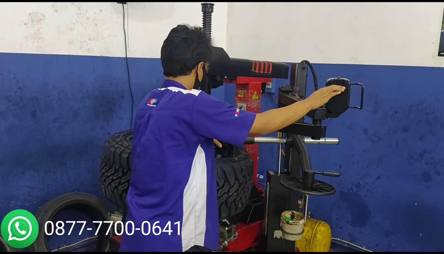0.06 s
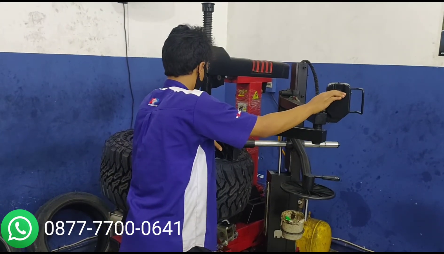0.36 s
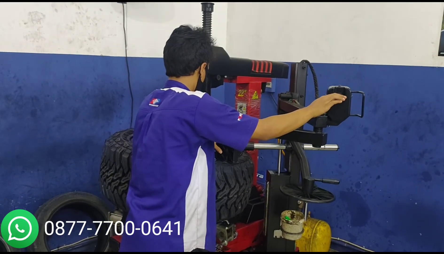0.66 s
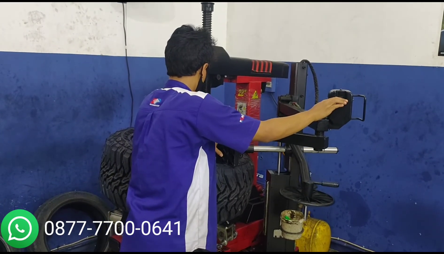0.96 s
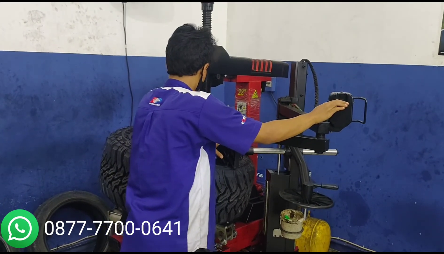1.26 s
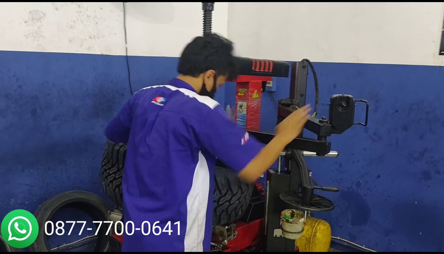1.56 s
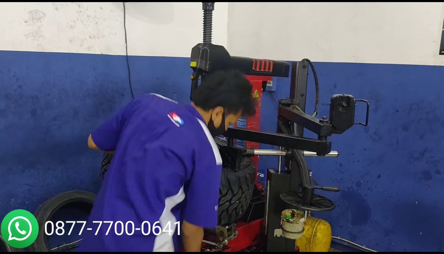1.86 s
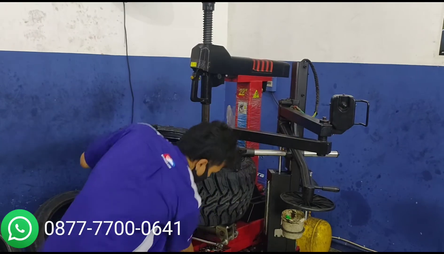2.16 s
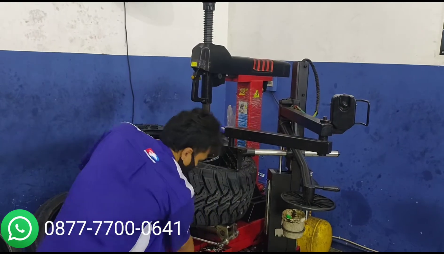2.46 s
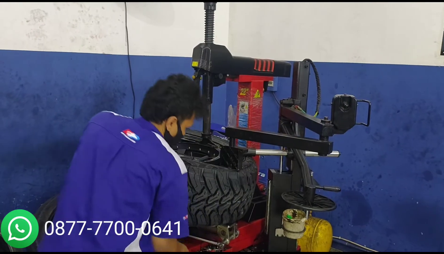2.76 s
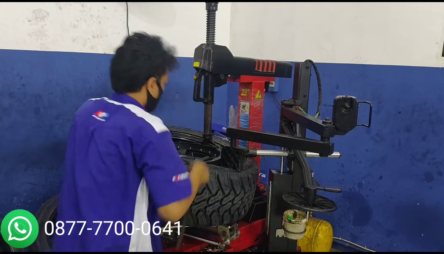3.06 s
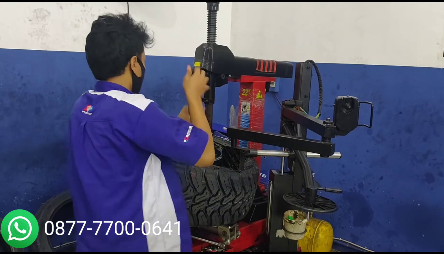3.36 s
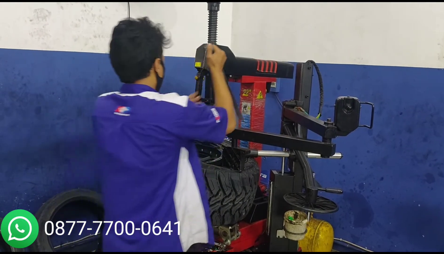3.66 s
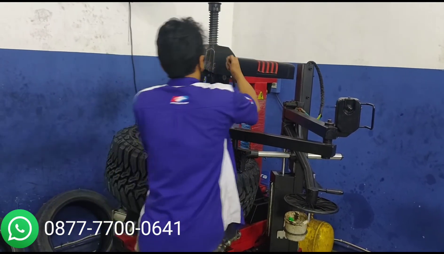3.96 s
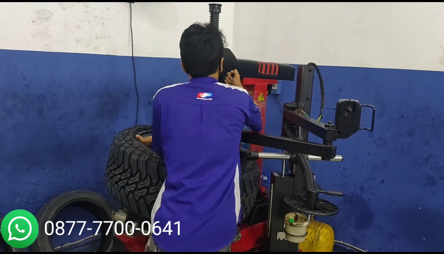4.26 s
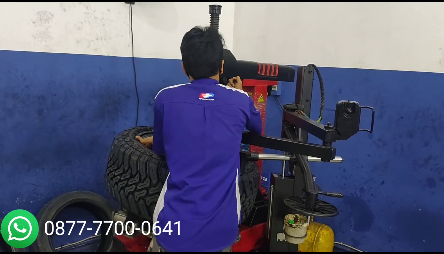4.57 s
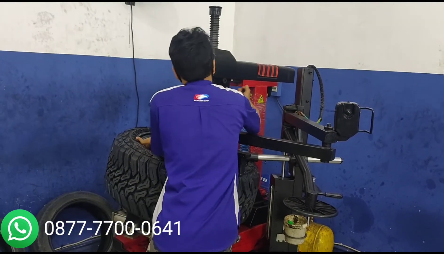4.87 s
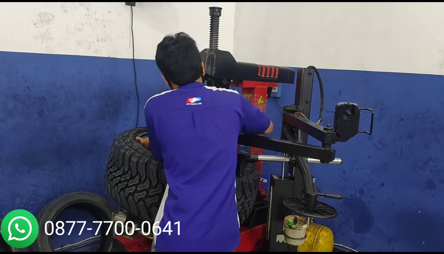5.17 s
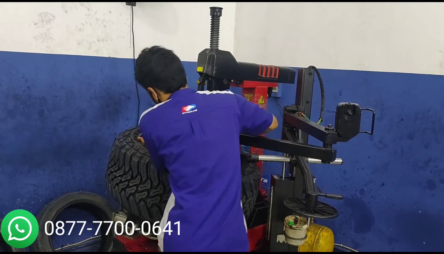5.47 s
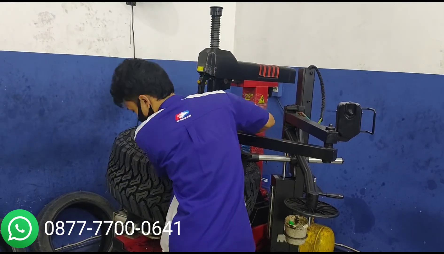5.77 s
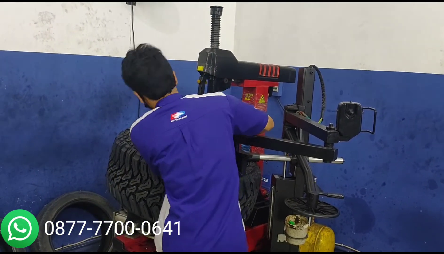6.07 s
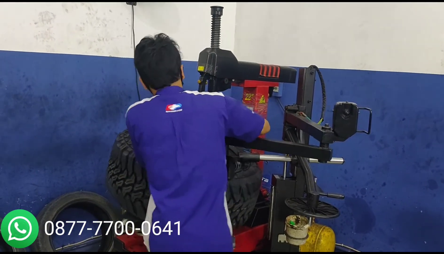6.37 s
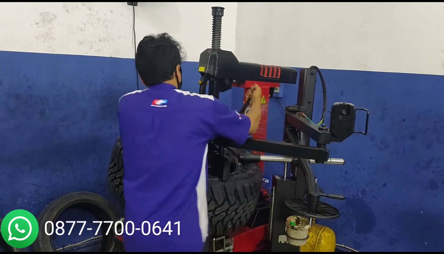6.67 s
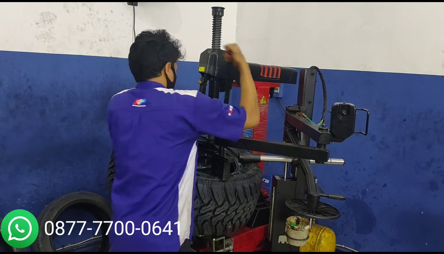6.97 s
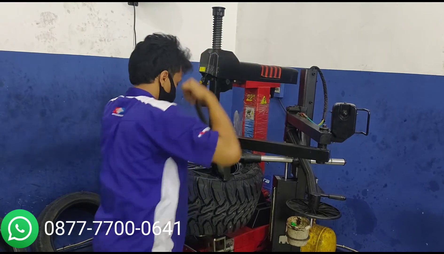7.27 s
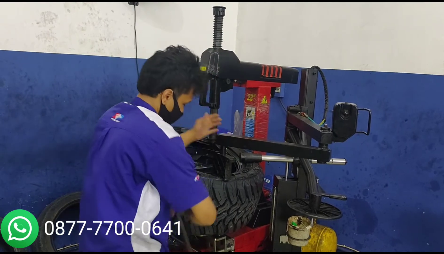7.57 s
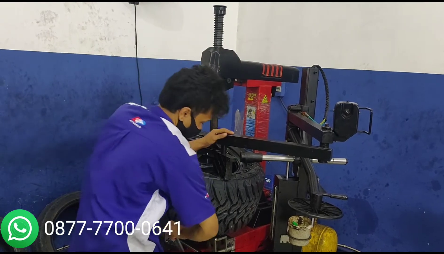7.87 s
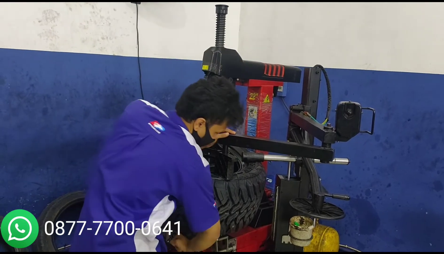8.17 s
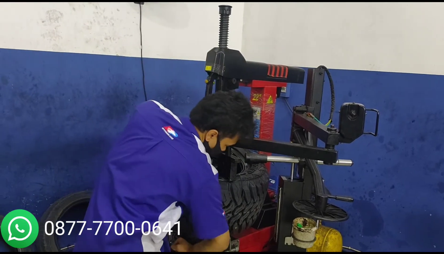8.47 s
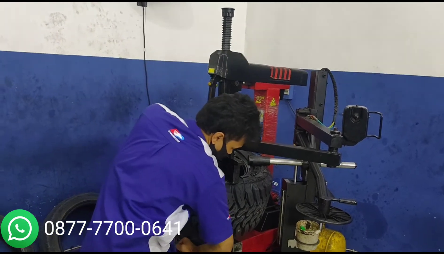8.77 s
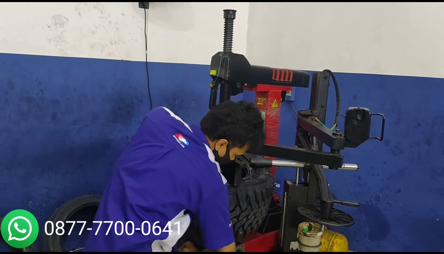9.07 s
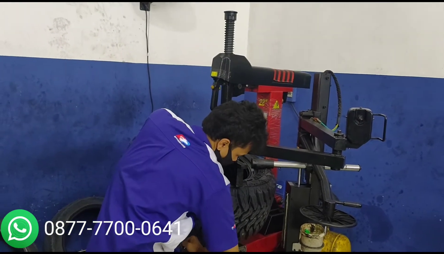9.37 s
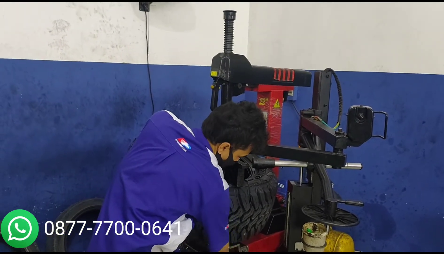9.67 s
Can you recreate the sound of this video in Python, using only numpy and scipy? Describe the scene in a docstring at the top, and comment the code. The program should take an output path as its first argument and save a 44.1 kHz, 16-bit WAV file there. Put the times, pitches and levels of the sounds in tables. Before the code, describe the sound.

A high, steady hiss of escaping air comes from a tyre machine and gradually thins. Early on, a tyre rubs softly and scrapes on its rim amid a rattle of ringing metal clanks. Soft thumps follow, and the hand-held microphone is bumped twice. Late on, a faint whistle joins the dying hiss, with two more bursts of clanking. The small workshop adds a short echo, and the hiss sits mostly to the right.

```python
"""Tyre changer venting air

A turbulent jet hisses from a tyre changer in a small hard-walled workshop, thinning as the pressure
falls and whistling as it runs out. Friction makes the tyre rub and scrape at first; impacts set steel
arms and clamps ringing. A hand-held camera, bumped twice, hears the treble mostly at its right port."""
import sys
import numpy as np
from scipy import signal
from scipy.fft import rfft, irfft, next_fast_len
from scipy.io import wavfile
from scipy.ndimage import uniform_filter1d, map_coordinates

SR = 44100
rng = np.random.default_rng(int(sys.argv[2]) if len(sys.argv) > 2 else 0)


def dump_mix(stems):
    """Bounce the given channels to the path in sys.argv[1] as a 16-bit WAV at rate SR."""
    frames = np.atleast_2d(stems).T  # one column per channel
    limited = np.clip(frames, -1, 1)  # hard clip at full scale
    pcm = np.round(limited * 32767).astype(np.int16)
    wavfile.write(sys.argv[1], SR, pcm)


N = 428652
TIME = np.arange(N) / SR

# spectrum of steel striking steel: frequency_hz, level_db
CLASH_SPECTRUM = [(120, -44), (300, -38.5), (400, -15), (500, 0), (730, 4), (1020, 5.5), (1500, 10),
                  (2300, 8), (3250, 10), (3900, -0.5), (5500, 3.5), (8200, 4.5), (10500, -6), (15000, -23)]
# spectrum of the thud of a heavy contact: frequency_hz, level_db
THUD_SPECTRUM = [(50, -37), (120, -26), (200, -2.5), (380, 3), (600, 3.5), (1000, 6.5), (1500, -17),
                 (4000, -59)]
# modes of the machine's frame: pitch_hz, level_db, t60_s
FRAME_MODES = [(373, -16.5, 0.16), (639, -12.5, 0.18), (710, -7, 0.079), (946.5, -13, 0.16),
               (1050, -8.5, 0.13), (1333, -18, 0.14), (2086, -7, 0.11), (2466, -5.5, 0.11),
               (2780, -6.5, 0.1), (5130, -3.5, 0.054)]
# the swing arm's hollow note and faint afterring: pitch_hz, level_db, t60_s
ARM_MODES = [(770, 3, 0.059), (800, -16, 0.43)]


def amp(db):
    """Decibels to amplitude ratio."""
    return 10 ** (np.asarray(db) / 20)


def unit(x):
    """Normalisation to rms 1."""
    return x / np.sqrt(np.mean(x ** 2) + 1e-20)


def along(points, hz):
    """Interpolation of (frequency_hz, value) points on a log frequency axis."""
    frequencies, values = np.transpose(points)
    return np.interp(np.log(hz + 1), np.log(frequencies + 1), values)


def wobble(rate_hz):
    """Smooth random modulation: a spline through rate_hz knots a second."""
    knots = rng.standard_normal(int(N * rate_hz / SR) + 4)
    return map_coordinates(knots, [np.arange(N) * rate_hz / SR])


def step(t, middle_s, takes_s):
    """A logistic transition from 0 to 1 around middle_s."""
    return (1 + np.tanh((t - middle_s) / takes_s / 2)) / 2


def fading(t, t60_s, attack_s):
    """Damped vibration: a quick rise, then exponential decay."""
    return amp(-60 * t / t60_s) * (1 - np.exp(-t / attack_s))


def add(track, start_s, sound):
    """Superposition of a sound on the track."""
    part = track[:, round(start_s * SR):][:, :sound.shape[-1]]
    part += sound[..., :part.shape[-1]]


def filtered(x, response):
    """Linear filtering: the spectrum is multiplied by response(hz)."""
    size = x.shape[-1]
    padded = next_fast_len(size + 8192)
    return irfft(rfft(x, padded) * response(np.fft.rfftfreq(padded, 1 / SR)), padded)[..., :size]


def swept(x, gain, size=512):
    """Time-varying filtering: short-time spectra are multiplied by gain(hz, t)."""
    hz, t, spectra = signal.stft(x, SR, nperseg=size)
    return signal.istft(spectra * gain(hz[:, None], t), SR)[1][:, :x.shape[-1]]


def patchy(x, depth_db, bands, frames, size=512):
    """Random modulation in patches of frequency and time, with deeper dips than peaks; rms 1."""
    def gain(hz, t):
        field = rng.standard_normal((2, len(hz), len(t)))
        field = unit(uniform_filter1d(uniform_filter1d(field, bands, 1), frames, 2))
        return amp(depth_db * np.minimum(field, 0.7))
    return unit(swept(x, gain, size))


def noise(spectrum, size=N):
    """Coloured noise of rms 1, partially coherent between the ports like the shop's sound field."""
    # left-right likeness of the field: frequency_hz, correlation
    coherence = [(60, 0.76), (150, 0.89), (300, 0.84), (700, 0.42), (1300, 0.17), (2600, -0.78),
                 (3700, -0.14), (5000, -0.15), (7000, -0.032), (8300, 0.23), (11000, -0.18)]
    def colour(hz):
        angle = np.arccos(np.clip(along(coherence, hz), -1, 1)) / 2
        return amp(along(spectrum, hz)) * [np.cos(angle), np.sin(angle)]
    mid, side = filtered(rng.standard_normal((2, size)), colour)
    return unit(np.array([mid + side, mid - side]))


def band(centre_hz, width, size):
    """A noise-driven resonance; width is a share of its pitch."""
    return noise([(centre_hz * (1 + width) ** k, -10 * k * k) for k in range(-3, 4)], size)


def valve_open(t, release_s=1.47, decay_s=0.52):
    """Exponential relaxation: 1 while the valve is held, dying away once it is let go."""
    return np.exp(-np.maximum(t - release_s, 0) / decay_s)


def running_low(t):
    """Depletion of the air: 0 while there is pressure, 1 when it is nearly spent."""
    return step(t, middle_s=8.9, takes_s=0.44)


def swelling(t):
    """Slow modulation: swells and dips add decibels to the hiss and to the vent's resonance."""
    # swells and dips: start_s, rise_s, decay_s, hiss_gain_db, resonance_gain_db
    swells = [(-0.15, 0.22, 0.28, 4, -4.5), (1.9, 0.25, 0.73, -1, -11), (2.6, 0.18, 2.5, 4.5, 5.5),
              (5.6, 0.34, .45, 4, 3), (5.9, 0.54, 1.5, 1.7, -0.5)]
    gains_db = 0
    for start_s, rise_s, decay_s, hiss_db, resonance_db in swells:
        rise = np.clip((t - start_s) / rise_s, 0, 1)
        decay = np.exp(-np.maximum(t - start_s - rise_s, 0) / decay_s)
        gains_db += np.outer([hiss_db, resonance_db], rise * decay)
    return gains_db


def hiss(start_db=-19, fall_db_per_s=1.154, flutter_db=0.2, drift_db=0.5):
    """Turbulence in the fine jet excites two vent resonances and fades as the pressure falls."""
    # spectrum of the jet: frequency_hz, level_db
    jet_spectrum = [(3500, -36), (5700, -13), (6200, -3.5), (6900, -3.5), (7300, -3), (8200, 1.5),
                    (9000, -1.5), (9700, -2.5), (10200, -7), (10800, -7.5), (12200, -14.5), (13600, -10.5),
                    (15500, -15)]
    def vent(hz, t):
        peak = lambda at_hz, wide_hz: 1 / (1 + (2 * (hz - at_hz) / wide_hz) ** 4)
        # the main resonance climbs and sharpens as the flow drops
        centre_hz = 7895 + 45 * t
        width_hz = 1050 * np.exp(-0.041 * t) * (1 - 0.35 * running_low(t))
        lift_db = 1 + 11.5 * running_low(t) + swelling(t)[1]
        upper_hz = 8900 + 686 * step(t, 2.6, 0.12)  # the upper resonance jumps higher at about 2.6 s
        gain = 1 + amp(lift_db) * peak(centre_hz, width_hz) + amp(-7) * peak(upper_hz, 510)
        return gain / np.linalg.norm(gain * amp(along(jet_spectrum, hz)), axis=0)  # constant power
    jet = swept(noise(jet_spectrum), vent)
    jet = patchy(jet, depth_db=0.97, bands=8, frames=7)
    jet = patchy(jet, depth_db=5.5, bands=1, frames=12, size=2048)
    level_db = start_db - fall_db_per_s * TIME - 2.5 * running_low(TIME) + swelling(TIME)[0]
    return jet * amp(level_db + flutter_db * wobble(26) + drift_db * wobble(3.96))


def rush(start_db=-29, fall_db_per_s=1.44, open_edge_hz=490, flutter_db=0.33):
    """Broadband flow noise: a rush of air roars below the hiss and gradually loses its low end."""
    # spectrum of the rush: frequency_hz, level_db
    rush_spectrum = [(200, -5), (800, 1.5), (1150, -2), (1650, 2), (2100, -4), (2600, 2), (3400, 0),
                     (4000, -4), (4700, -1), (5300, 0.5), (5750, -1.5), (7000, -23), (10000, -34)]
    def high_pass(hz, t):
        shut_edge_hz = 1280 + 64 * t + 800 * running_low(t)
        edge_hz = shut_edge_hz + (open_edge_hz - shut_edge_hz) * valve_open(t)
        return 1 / np.sqrt(1 + (edge_hz / (hz + 1)) ** 16)
    air = swept(noise(rush_spectrum), high_pass)
    air = patchy(air, depth_db=2.3, bands=2, frames=13)
    air = patchy(air, depth_db=5.5, bands=2, frames=7, size=2048)
    level_db = start_db - fall_db_per_s * TIME - 3.5 * running_low(TIME) + 0.16 * swelling(TIME)[0]
    return air * amp(level_db + flutter_db * wobble(22))


def tyre_rub(creep_db=-52, attack_s=0.008, release_s=0.052):
    """Friction: rubber creeps on the table while the valve is held, and judders in short drags."""
    # spectrum of rubbing rubber: frequency_hz, level_db
    rubber_spectrum = [(60, -43.5), (130, -17.5), (200, 5), (270, 2), (400, 2), (600, 0.5), (1200, -37)]
    # spectrum of the rumble beneath it: frequency_hz, level_db
    rumble_spectrum = [(20, -10), (48, 2), (90, 6), (150, 3), (280, -29)]
    # drags on the table: start_s, length_s, rub_gain_db, rumble_gain_db
    drags = [(0, 0.14, -41.5, -57), (0.26, 0.16, -45, -64), (0.564, 0.27, -50, -69),
             (0.784, 0.12, -45, -43), (1.308, 0.19, -60, -63), (1.558, 0.39, -43.5, -62),
             (2.033, 0.18, -61, -56)]
    rub, rumble = amp(creep_db) * valve_open(TIME), 0
    for start_s, length_s, rub_db, rumble_db in drags:
        drag = step(TIME, start_s, attack_s) * (1 - step(TIME, start_s + length_s, release_s))
        rub += amp(rub_db - 1) * drag
        rumble += amp(rumble_db - 2) * drag
    judder = patchy(noise(rubber_spectrum), depth_db=3.5, bands=2, frames=8)
    return judder * rub + noise(rumble_spectrum) * rumble


def background(start_db=-51, sink_db=11, drift_db=0.5):
    """The shop's low ambient noise wavers and sinks to a quieter level."""
    # ambient spectrum: frequency_hz, level_db
    shop_spectrum = [(20, -23), (45, 4.5), (90, 0), (170, -2.5), (300, -8.5), (700, -9.5), (1300, -15.5),
                     (4000, -12.5), (12000, -43)]
    level_db = start_db - sink_db * step(TIME, 2.9, 0.98) - drift_db * wobble(3.04)
    return amp(level_db) * noise(shop_spectrum)


def ring(t, modes, treble_db=0, scatter_db=2.5, detune=0.0072):
    """Free vibration of damped modes, whose pitch and strength vary from blow to blow."""
    out = np.zeros((2, len(t)))
    for hz, db, t60_s in modes:
        # high modes reach the ports out of step
        phase = rng.uniform(0, 2 * np.pi) + rng.normal(0, min(hz / 2400, 2), (2, 1))
        level_db = db + rng.normal(0, scatter_db) + treble_db * (hz > 1400)
        pitch_hz = hz * (1 + detune * rng.standard_normal())
        out += amp(level_db) * fading(t, t60_s, 0.0017) * np.sin(2 * np.pi * pitch_hz * t + phase)
    return out


def in_shop(sound, wet_db):
    """Reverberation: reflections from the hard walls add a diffuse, decaying tail."""
    # reverberation time of the shop: frequency_hz, t60_s
    decay_times = [(150, 0.4), (700, 0.62), (3000, 0.36), (10000, 0.28)]
    size = sound.shape[-1]
    white = noise([(20, 0), (20000, 0)], size)
    tail = swept(white, lambda hz, t: amp(-60 * t / along(decay_times, hz)))
    tail *= 1 - np.exp(-np.arange(size) / SR / 0.0014)
    tail /= np.linalg.norm(tail[0])
    return sound + amp(wet_db) * signal.fftconvolve(sound, tail, axes=1)[:, :size]


def clanks(rebound_s=0.015):
    """Impacts clash and excite the steel's modes; with weight behind them they thud and rebound once."""
    # steel on steel: start_s, gain_db, bright_db, wheel_weight, arm_gain, jaw_gain, lever_gain, rise_s
    impacts = [(1.297, -22.5, -1.5, 0.9, 0.45, 0, 0.05, 0.0014),
               (2.439, -12, -10.5, 0.3, 0.63, 0, 0.2, 0.0043),
               (2.509, -18, -18.5, 0.55, 0.3, 0.06, 0, 0.0022),
               (2.574, -13.5, -9, 0.77, 0.1, 0.1, 0.1, 0.001), (2.608, -12, -6.5, 0.36, .4, 0, 0.3, 0.0023),
               (2.661, -11.5, -4, 0.63, 0.4, 0.17, 0, 0.0019),
               (2.691, -12, -2, 0.71, 0.24, 0, 0.25, 0.0012), (2.711, -22, 0, 0.6, 0.5, .2, .1, 0.0012),
               (2.74, -19, -2, 0.76, 0, 0.1, 0.1, 0.002), (2.824, -15, -9.5, 0.65, 0.2, 0, 0, 0.003),
               (2.868, -32.5, -13, 0.3, 0.3, 0.4, 0.2, .002),
               (8.181, -13.5, -2, 0.1, 0.4, 0.22, 0.3, 0.0015),
               (8.264, -18, -3, 0.1, 0.6, 0.04, 0.1, 0.0012),
               (8.278, -12.5, -2.5, 0.35, 0.44, 0.3, 0, 0.0015),
               (8.289, -15, -6, 0.64, 0.5, 0, 0.06, 0.00076), (8.376, -28, -8, 0, 0.8, 0, 0, 0.0035),
               (8.405, -20.5, 1.5, 0.06, 0.7, 1, 0.6, 0.0016), (8.433, -30.5, 3.5, 0, 0.85, .2, 0, 0.0016),
               (9.553, -23, -7, 0, 1, 0.07, .1, 0.0032), (9.604, -15, -6.5, 0.2, 0.77, 0.24, 0.96, 0.00078),
               (9.628, -22, -4.5, 0.41, 0.5, 0, 0, .002), (9.716, -30, -4, 0, 0.5, 0.76, 0, 0.0025)]
    # modes of a clamping jaw: pitch_hz, level_db, t60_s
    jaw_modes = [(3140, 2.5, 0.062), (3270, 4.5, 0.06), (6800, -20, 0.043), (8250, 4, 0.073)]
    # modes of the lever: pitch_hz, level_db, t60_s
    lever_modes = [(2960, 2, 0.024), (4320, -6, 0.045), (7500, -7, 0.17), (8140, 0, 0.065)]
    out, t = np.zeros((2, N)), np.arange(SR // 2) / SR
    for start_s, gain_db, bright_db, weight, arm, jaw, lever, rise_s in impacts:
        for delay_s, strength in [(0, 1), (rebound_s, amp(-2) * weight)]:
            burst = fading(t, 0.076, 0.00068) + 0.6 * fading(t, 0.0086, 0.0005)
            clash = amp(1 + bright_db) * noise(CLASH_SPECTRUM, len(t)) * burst
            thud = amp(-7) * weight ** 2 * noise(THUD_SPECTRUM, len(t)) * fading(t, 0.32, 0.0016)
            steel = amp(-5) * ring(t, FRAME_MODES, treble_db=bright_db)
            steel += arm * ring(t, ARM_MODES, scatter_db=1)
            steel += jaw * ring(t, jaw_modes) + lever * ring(t, lever_modes)
            blow = (steel + clash + thud) * (1 - np.exp(-t / rise_s))
            add(out, start_s + delay_s - 0.001, amp(gain_db) * strength * in_shop(blow, wet_db=-8.5))
    return out


def thumps(width=0.2):
    """Damped resonance: tyre and arm answer a light push, or the boom of a heavy blow, with one short, hollow
    note."""
    # light pushes and booms after heavy blows: start_s, gain_db, pitch_hz, t60_s
    pushes = [(1.877, -28, 271, 0.16), (2.114, -37.5, 348, 0.15), (2.68, -28.5, 202, .25),
              (5.122, -39, 382, 0.12), (6.231, -36, 362, 0.3), (6.467, -48, 335, 0.14),
              (6.555, -35.5, 304, .11), (7.928, -51, 176, 0.24), (8.293, -35.5, 192, 0.19),
              (9.383, -42, 296, 0.36)]
    out, t = np.zeros((2, N)), np.arange(SR // 2) / SR
    for start_s, gain_db, pitch_hz, t60_s in pushes:
        add(out, start_s, amp(gain_db) * band(pitch_hz, width, len(t)) * fading(t, t60_s, 0.0063))
    return out


def knocks(swell_s=0.018, scuff_db=-8):
    """Forced vibration: a padded contact slides briefly and stirs the low modes of frame and arm."""
    # padded contacts of the arm: start_s, gain_db, cutoff_hz, thud_db
    contacts = [(2.345, -31.5, 1100, 0), (2.374, -27.5, 940, -1.5), (2.99, -29, 1150, -16),
                (3.6, -41, 800, -4), (4.48, -40.5, 1400, -8), (5.118, -28.5, 1200, -13),
                (5.328, -45, 1020, 0), (6.213, -30, 1124, -5), (6.25, -24.5, 770, -3.5),
                (6.708, -40.5, 970, -11), (9.01, -47, 1120, -11), (9.47, -43, 2800, -20)]
    size = SR // 2
    out, t = np.zeros((2, N)), np.arange(size) / SR
    envelope = t / swell_s * np.exp(-t / swell_s)
    for start_s, gain_db, cutoff_hz, thud_db in contacts:
        modes = ring(t, FRAME_MODES) + amp(-6) * ring(t, ARM_MODES)
        friction = rng.standard_normal((1, 2 * size))
        stirred = unit(signal.fftconvolve(modes, friction, axes=1)[:, size:2 * size])
        scuff = amp(scuff_db) * noise(CLASH_SPECTRUM, size)
        thud = amp(thud_db) * noise(THUD_SPECTRUM, size)
        soft = signal.sosfilt(signal.butter(4, cutoff_hz, fs=SR, output="sos"), stirred + scuff + thud)
        add(out, start_s, amp(gain_db) * in_shop(soft * envelope, wet_db=-10))
    return out


def bead_scrape(attack_s=0.011, release_s=0.025):
    """Sliding friction: the tyre's bead scrapes along the rim between the blows."""
    # spectrum of bead on rim: frequency_hz, level_db
    bead_spectrum = [(150, -25), (330, -17), (500, -3), (730, 3), (1050, 4), (1400, -7), (3200, -6),
                     (4500, -35)]
    # slides of the bead: start_s, length_s, level_db
    slides = [(2.425, 0.11, -31.5), (2.592, 0.11, -26.5)]
    envelope = sum(amp(db) * step(TIME, start_s, attack_s) * (1 - step(TIME, start_s + length_s, release_s))
                   for start_s, length_s, db in slides)
    return envelope * noise(bead_spectrum)


def rim_ring(pitch_hz=640, width=0.29, t60_s=1.53):
    """Light damping lets a cluster of the wheel's close modes linger after heavy blows."""
    # heavy blows: start_s, gain_db
    blows = [(2.7, -34), (6.26, -58), (8.29, -53)]
    out, t = np.zeros((2, N)), np.arange(2 * SR) / SR
    for start_s, gain_db in blows:
        add(out, start_s, amp(gain_db) * band(pitch_hz, width, len(t)) * fading(t, t60_s, 0.017))
    return out


def camera_bumps(contact_s=0.00014, rebound_s=0.0011, low_cut_hz=55, rustle_db=-31):
    """Structure-borne sound in the camera's shell: a sharp push, its rebound and a trace of rustle."""
    # finger taps: start_s, gain_db
    taps = [(3.674, -21), (5.6345, -17)]
    # spectrum of the rustle: frequency_hz, level_db
    rustle_spectrum = [(25, -26), (60, 12), (300, -4), (1100, 4), (1800, -21), (4000, -30)]
    out, t = np.zeros((2, N)), np.arange(SR // 4) / SR
    push = lambda at_s: np.exp(-((t - at_s) / contact_s) ** 2)
    force = push(rebound_s) + 0.55 * push(2 * rebound_s)
    click = signal.sosfilt(signal.butter(2, low_cut_hz, "high", fs=SR, output="sos"), force)
    for start_s, gain_db in taps:
        rustle = amp(rustle_db) * noise(rustle_spectrum, len(t)) * fading(t, 0.63, 0.0017)
        add(out, start_s - rebound_s, amp(gain_db) * (rustle - click))
    return out


def whistle(pitch_hz=2550, waver_hz=15, flutter_db=1.2, port_shift_rad=2.2):
    """An edge tone swells at low pressure, then flickers on faintly, out of phase between the ports."""
    # envelope of the edge tone: time_s, level_db
    envelope = [(7.4, -67), (7.66, -55), (7.74, -45), (7.82, -43), (7.9, -37), (7.98, -37.5), (8.05, -42),
                (8.15, -41), (8.6, -43), (8.85, -49), (9.1, -54), (9.6, -64)]
    times_s, levels_db = np.transpose(envelope)
    phase = 2 * np.pi * np.cumsum(pitch_hz + waver_hz * wobble(120)) / SR
    ports = np.sin([phase, phase + port_shift_rad + 0.5 * wobble(10)])
    level_db = np.interp(TIME, times_s, levels_db) + flutter_db * wobble(26)
    return (TIME > times_s[0]) * amp(level_db) * ports


def vent_tones(start_s=8.65, fall_db_per_s=3.5, waver_hz=14, flutter_db=2):
    """With the last of the air, the vent's resonance narrows to fuzzy tones of narrow-band noise."""
    # whistling tones: pitch_hz, width_hz, gain_db
    tones = [(8400, 52, -35.5), (8570, 60, -32.5)]
    out = 0
    for pitch_hz, width_hz, gain_db in tones:
        phase = 2 * np.pi * np.cumsum(pitch_hz + waver_hz * wobble(8)) / SR
        tone = wobble(width_hz) * np.sin(phase) + wobble(width_hz) * np.cos(phase)
        out += amp(gain_db + flutter_db * wobble(8.2)) * tone
    return out * step(TIME, start_s, 0.25) * amp(-fall_db_per_s * np.maximum(TIME - start_s, 0))


def scene():
    """Superposition of air, machine, camera bumps and the shop's background."""
    air = hiss() + rush() + whistle() + vent_tones()
    machine = tyre_rub() + bead_scrape() + thumps() + clanks() + rim_ring() + knocks()
    return air + machine + camera_bumps() + background()


def record(dry, notch_hz=4050, notch_width_hz=180, notch_db=-7, top_hz=15650):
    """Frequency response: the left port is dull in the treble; both have a notch and a band limit."""
    # left port relative to right: frequency_hz, gain_db
    left_response = [(100, -2.5), (600, -1.5), (2000, 0.5), (3100, 4), (4600, 0.5), (5700, -4.5),
                     (6900, -24), (7600, -26.5), (8200, -25.5), (9100, -22), (10600, -9.5), (11700, -20),
                     (14000, -17), (15500, -29)]
    notch = lambda hz: amp(notch_db * np.exp(-((hz - notch_hz) / notch_width_hz) ** 2))
    ports = filtered(dry, lambda hz: notch(hz) * amp([along(left_response, hz), 0 * hz]))
    return filtered(ports, lambda hz: hz < top_hz)


dry = scene()
out = record(dry)
dump_mix(out)
```